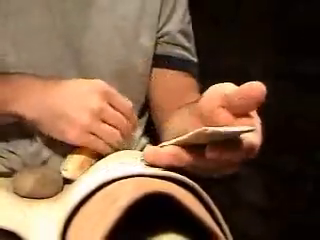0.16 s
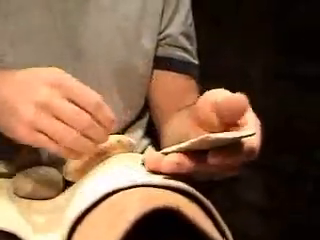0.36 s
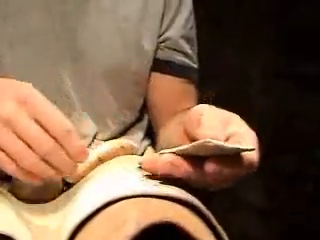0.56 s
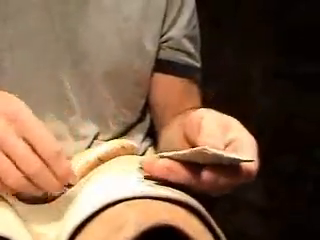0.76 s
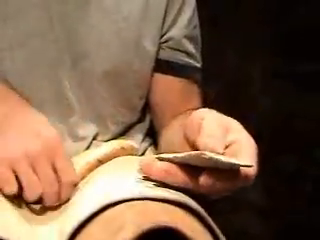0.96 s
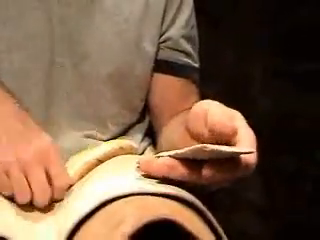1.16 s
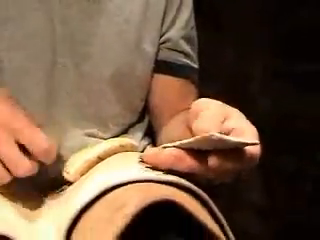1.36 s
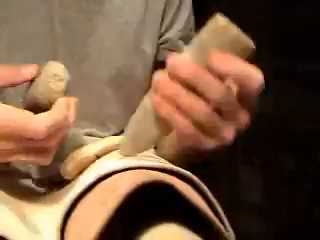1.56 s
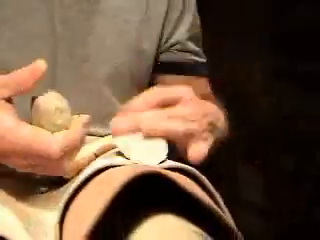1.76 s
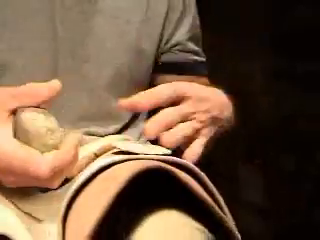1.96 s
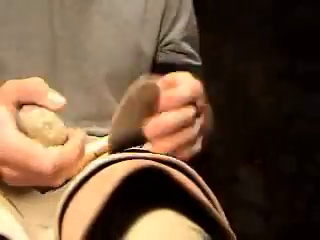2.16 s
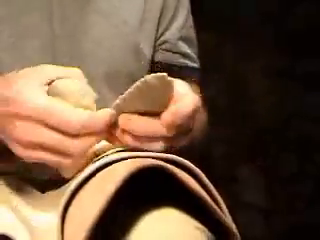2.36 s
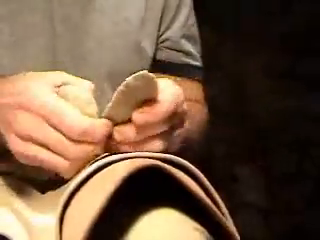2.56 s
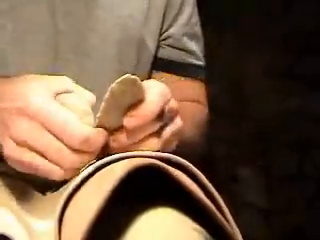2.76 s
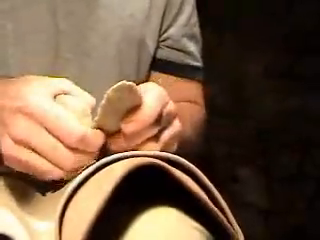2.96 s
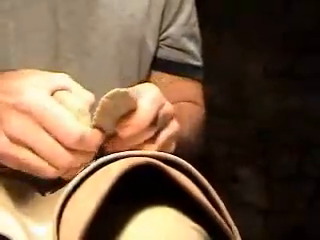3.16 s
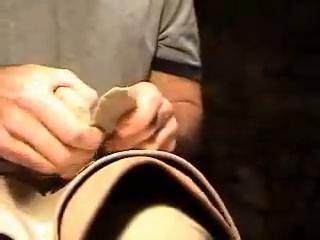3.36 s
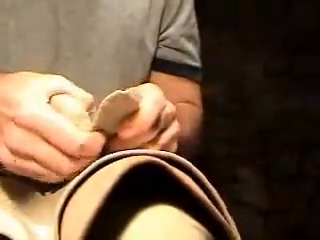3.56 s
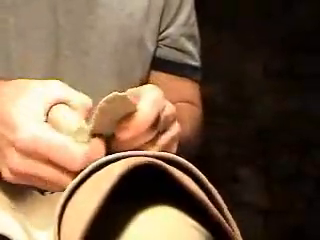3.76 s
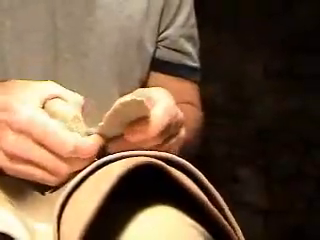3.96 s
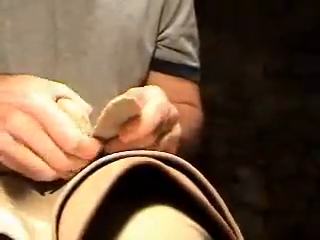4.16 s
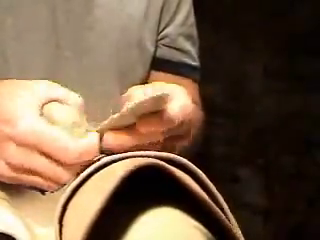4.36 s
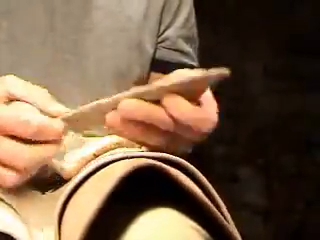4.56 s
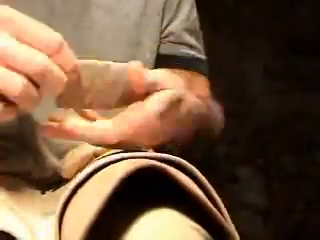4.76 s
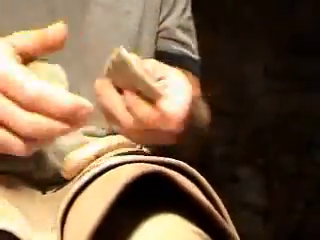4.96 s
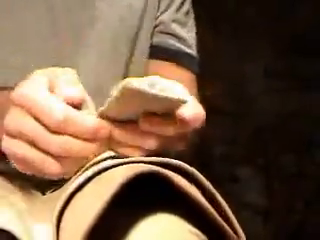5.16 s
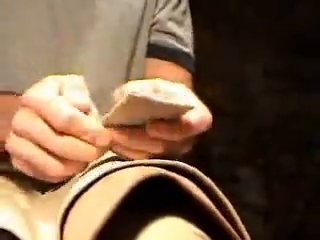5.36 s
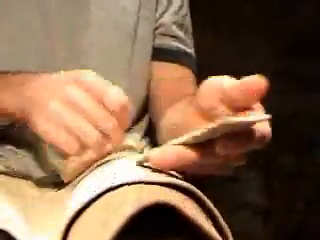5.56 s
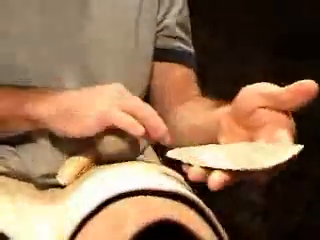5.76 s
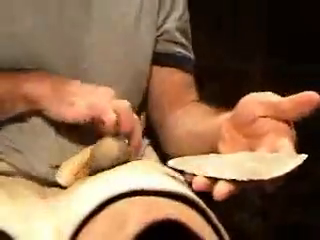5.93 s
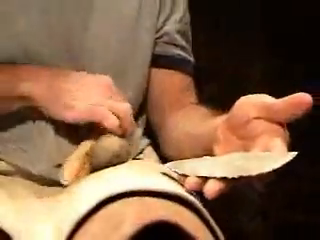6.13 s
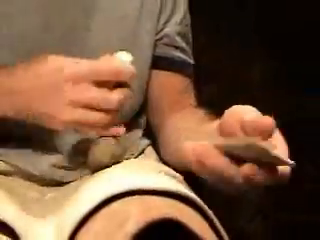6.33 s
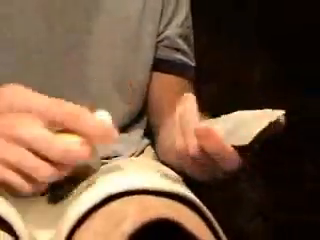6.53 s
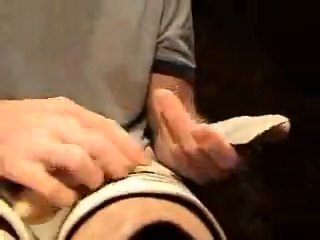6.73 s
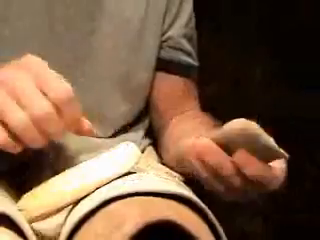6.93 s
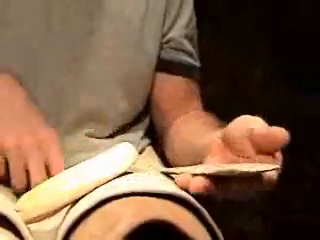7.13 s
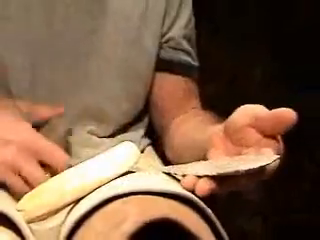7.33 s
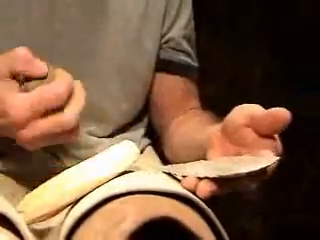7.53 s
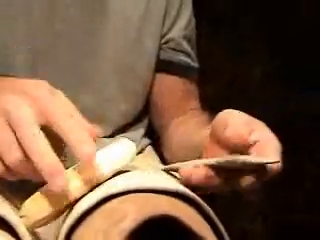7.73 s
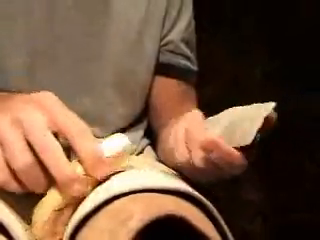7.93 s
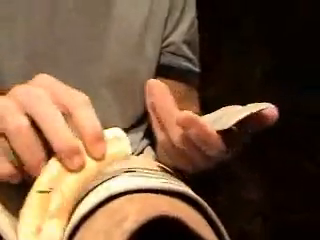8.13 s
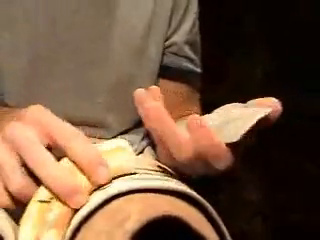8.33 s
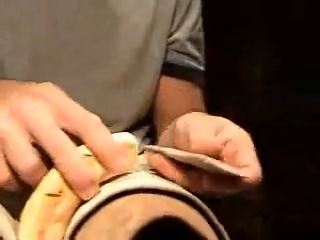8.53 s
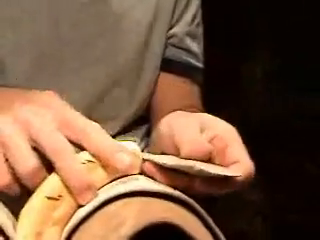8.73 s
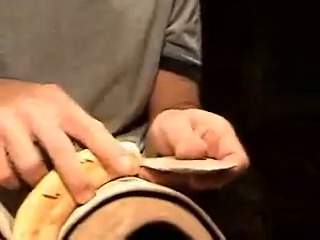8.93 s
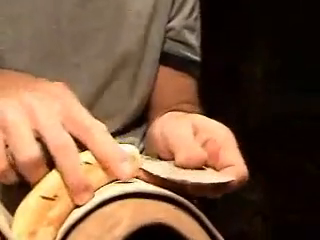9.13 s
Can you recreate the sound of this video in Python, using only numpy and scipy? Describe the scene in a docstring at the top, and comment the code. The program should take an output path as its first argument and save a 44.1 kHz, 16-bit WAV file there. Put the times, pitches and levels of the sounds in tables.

```python
"""A bare room, with a close microphone facing a knapper at work; the sound is narrow-band, nearly mono.
He rasps the edge of a flint blade with a small abrading stone: the grit grinds, catches and rings the
hand-held blade. Between strokes he brushes the leather leg pad, turns the blade in his fingers and sets
stones and tools down on his lap. The walls answer; a faint low drone, like a far engine, rises late."""
import sys
import numpy as np
from scipy import signal
from scipy.fft import rfft, irfft, next_fast_len
from scipy.io import wavfile
from scipy.ndimage import uniform_filter1d, minimum_filter1d

SR = 44100
rng = np.random.default_rng(int(sys.argv[2]) if len(sys.argv) > 2 else 0)


def master_out(mix):
    """Clip the mix to full scale and print it as 16-bit PCM to the path in sys.argv[1]."""
    frames = np.transpose(np.atleast_2d(mix))
    ceiling = np.clip(frames, -1, 1)
    pcm = np.round(ceiling * 32767).astype(np.int16)
    wavfile.write(sys.argv[1], SR, pcm)


N = 405279

# Strokes along the edge. Each row: start and length in seconds, then ring level, crunch level and
# sag of the pressure over the stroke, all in dB.
EDGE_STROKES = [(2.98, 0.077, -25, -30, 12.5), (3.109, 0.053, -26, -31, 0), (3.214, 0.15, -28, -36.5, 6),
                (3.381, 0.095, -30, -24.5, -2), (3.474, 0.055, -23, -27, 3), (3.551, 0.029, -19, -25, -6),
                (3.654, 0.08, -26, -24.5, 7), (3.767, 0.033, -23, -31, -4), (3.856, 0.044, -29, -29, 8),
                (3.896, 0.089, -25, -28.5, -1.5), (4.389, 0.048, -30, -34.5, -15),
                (4.464, 0.029, -22, -26.5, 14), (4.495, 0.045, -27, -31.5, 4),
                (5.372, 0.14, -20.5, -26.5, 1), (5.514, 0.1, -17, -27, 1), (5.564, 0.094, -25.5, -25.5, 7)]
# Grit catches on the edge. Each row: start in seconds, level in dB, ring in Hz, chip over ring in dB.
GRIT_CATCHES = [(2.8549, -26.5, 2120, -18.5), (2.8714, -26, 1920, -23), (2.9272, -14.5, 2110, -21.5),
                (2.9455, -12, 2060, -18.5), (2.9622, -12.5, 2200, -12), (2.9755, -6.5, 2210, -25),
                (2.9876, -2, 2200, -12), (2.9912, -2.5, 2120, -28), (3.0028, -10.5, 2090, -9),
                (3.0085, -5.5, 2150, -14), (3.0264, -10, 1940, -10), (3.1364, -6, 2110, -17),
                (3.1748, -13, 2080, -18), (3.2006, -7.5, 2166, -24), (3.2168, 2, 2134, -21),
                (3.2268, -6.5, 2150, -19), (3.2372, -6.5, 1980, -9.5), (3.2445, -4.5, 1980, -23),
                (3.2984, -15.5, 2130, -26), (3.3105, -14, 2130, -25), (3.3885, -3, 2050, -10.5),
                (3.4092, -4.5, 2270, -13.5), (3.4283, -5.5, 2250, -12), (3.4397, -8.5, 2310, -12),
                (3.4565, -3.5, 2210, -10.5), (3.4775, -6, 2130, -1), (3.4828, -11, 2025, -15),
                (3.4905, -11, 2130, -27), (3.4954, -12, 2080, -16), (3.5563, -8, 1890, -15),
                (3.5618, -2, 2190, -8.5), (3.5665, -13, 2100, -11), (3.5714, -5, 2050, -8),
                (3.6632, -3, 2150, -16), (3.6684, -7, 2130, -10.5), (3.6872, 0, 2130, -18.5),
                (3.6914, -3, 2140, -17), (3.6964, -5.5, 2120, -17), (3.7114, -8, 2160, -22),
                (3.7784, -10.5, 1950, -12), (3.7858, -11.5, 2100, -20), (3.7963, -3.5, 2100, -21),
                (3.8676, -13.5, 2210, -4), (3.8822, -13, 2160, -17), (3.8995, -2, 2050, -1.5),
                (3.9034, -5.5, 2200, -14), (3.9135, -16, 2190, -18), (3.9285, -6.5, 2090, -21),
                (4.3785, -26.5, 2020, -12), (4.4233, -5.5, 2105, -22), (4.4324, -12, 2030, -14),
                (4.4433, -11.5, 2210, -6.5), (4.4677, -5.5, 2030, -19), (4.4955, -9, 2375, -11),
                (4.5044, -10, 2160, -19), (4.5205, -16, 2110, -28), (5.4181, -7, 2080, -18),
                (5.4665, -7, 2000, -26), (5.5185, -6, 2020, -26), (5.5234, -8, 1980, -27),
                (5.5444, -7.5, 1960, -20)]
# The blade's resonances. Each row: frequency in Hz, width in Hz, level in dB.
UPRIGHT_MODES = [(1065, 210, -13.5), (1860, 320, -5), (2183, 293, -3), (2310, 660, -7.5),
                 (2740, 176, -15.5), (3687, 170, -18.5), (4620, 200, -18), (5104, 190, -14.5),
                 (5770, 150, -16.5), (6350, 110, -19), (6700, 130, -19), (7500, 49, -24.5)]
FLAT_MODES = [(1090, 390, -14), (1980, 600, 1.5), (2200, 370, -0.5), (2790, 270, -7.5), (4710, 400, -17),
              (5410, 460, -21), (6770, 250, -23.5)]
LOOSE_MODES = [(1910, 9.2, 8), (1990, 11, 9), (2130, 13, -1.5)]  # these ring on when the blade lies flat
SINGING_MODES = [(1944, 34, 1), (4708, 140, 1), (5564, 130, -3.5), (7360, 130, -7.5)]  # under sliding fingers, lowest first
# Stone on stone. Each row: start in seconds, peak in dB.
BLADE_TAPS = [(4.967, -39.5), (5.3433, -1.5)]  # the stone taps the loosely held blade
COBBLE_CLACKS = [(5.8898, -0.5), (5.8918, -9.5)]  # it drops against another stone and strikes twice
# The ring after a blow. Each row: frequency in Hz, level in dB, seconds to fall 60 dB.
BLADE_FREE_MODES = [(1797, -19.5, 0.084), (1992, 0, 0.059), (2210, -4, 0.041), (2320, 16.5, 0.0077),
                    (2910, 20, 0.004), (4550, -5.5, 0.016), (5750, -32, 0.077), (7140, -14, 0.014)]
COBBLE_MODES = [(2780, -5.5, 0.0084), (3400, -17.5, 0.0099), (4910, -15.5, 0.0088), (6471, -34, 0.036),
                (7170, -26, 0.015)]
# Tools land on the lap. Each row: start in seconds, peak in dB, click over thud in dB, hollow note in Hz.
LAP_KNOCKS = [(0.2455, -30, -10, 432), (1.9494, -19, -7, 370), (2.0581, -19, 0, 490),
              (2.2613, -25.5, 1, 394), (6.0436, -16, 6.5, 680), (6.1567, -28, -6, 680),
              (6.7848, -16, 2, 500), (7.1857, -21, -7, 463), (7.315, -28.5, -14, 680),
              (7.3592, -23, -2, 680), (7.435, -15, -1.5, 700), (8.0005, -33, 4, 700),
              (8.375, -31.5, 5, 700), (8.4075, -26, -5, 710)]
# Slides over leather and cloth. Each row: peak time, rise and fall in seconds, rustle and hiss in dB.
LEATHER_SLIDES = [(0.281, 0.16, 0.17, -48.5, -60), (0.62, 0.051, 0.098, -38, -34),
                  (1.035, .02, 0.076, -46, -43.5), (1.15, 0.16, 0.1, -43.5, -56),
                  (1.355, 0.082, 0.21, -41.5, -47.5), (1.809, 0.16, 0.059, -41.5, -47),
                  (2.41, 0.17, 0.073, -42, -49.5), (5.0, 0.095, 0.11, -54, -52.5),
                  (6.385, 0.093, 0.1, -48, -57.5), (6.989, 0.19, 0.028, -40.5, -48.5),
                  (7.44, 0.048, 0.014, -37, -42.5), (8.06, 0.068, 0.084, -40, -48),
                  (8.18, 0.039, 0.11, -44, -53), (8.53, 0.63, 0.5, -51.5, -60)]
# Quick scuffs on the gritty pad. Each row: start in seconds, peak in dB, length in seconds.
PAD_SCUFFS = [(0.602, -17, 0.018), (1.02, -19.5, 0.0077), (1.48, -30, 0.024), (1.529, -28.5, 0.0075),
              (1.617, -29.5, 0.025), (1.797, -31.5, 0.02), (5.793, -31.5, 0.0065), (5.839, -31, 0.051),
              (6.854, -22.5, 0.016), (6.876, -24.5, 0.013), (6.958, -30, 0.021), (7.285, -29.5, 0.023),
              (8.004, -36, 0.03), (8.046, -33, 0.038)]
# Fingers on the blade. Each row: peak time and rise in seconds, lowest mode and upper modes in dB.
FINGER_SLIDES = [(0.088, .067, -57.5, -53.5), (1.808, 0.059, -38, -38), (2.041, 0.11, -54, -45),
                 (2.45, .04, -45.5, -48), (4.82, .06, -61, -56), (5.077, 0.055, -50, -51.5),
                 (7.16, .06, -50, -54.5), (8.662, 0.047, -60, -51)]
# The far drone. Each row: time in seconds, pitch in Hz, level in dB.
DRONE_PATH = [(0.0, 30.1, -50.5), (0.54, 33.16, -63), (1.56, 28.54, -59), (2.89, 27.4, -47),
              (5.04, 26.57, -59.5), (5.71, 27.5, -53), (6.301, 48.34, -59.5), (7.37, 50.4, -50.5),
              (7.78, 56.7, -54), (9.19, 60.1, -54.5)]
# Spectra. Each row: frequency in Hz, gain in dB.
GRIT_SPECTRUM = [(40, -26.5), (150, -29), (500, -19.5), (1400, -20), (3200, -32), (5000, -26.5),
                 (7600, -27.5), (9000, -25)]  # crushing under the blade's resonances
COBBLE_SPECTRUM = [(40, -8), (130, -3), (400, -8.5), (1000, -1), (1800, 2), (3500, -1), (3850, -25),
                   (4600, -26), (5200, 2.5), (5700, -36), (8000, -50)]  # its thump and heavily damped body
THUD_SPECTRUM = [(35, -43), (70, -3.5), (220, 4.5), (400, 3.5), (750, 7.5), (1100, 3), (1980, -1.5),
                 (3100, -10.5), (4000, -28), (5200, -70)]
CLICK_SPECTRUM = [(300, -25.5), (850, -1.5), (1600, 5.5), (2400, -3), (3300, -10), (4200, -22), (8000, -37)]
RUSTLE_SPECTRUM = [(120, -53), (200, -2.5), (588, -4.5), (1150, 0), (1640, 0), (4000, -9), (5200, -44.5),
                   (8800, -120)]
HISS_SPECTRUM = [(1000, -22), (2500, -3.5), (4500, 5), (7500, 6), (9000, -41)]
SCUFF_SPECTRUM = [(88, -55), (150, -13), (296, 2.5), (566, -3.5), (2570, 3.5), (3030, -5.5), (3400, -2.5),
                  (10300, -4), (17500, -74)]
WALL_SPECTRUM = [(150, 3.5), (700, 2.5), (1400, -1.5), (2100, -3), (3000, -1.5), (7500, 0.5)]
ROOM_TONE_SPECTRUM = [(29, -22.5), (50, -2.5), (360, -14.5), (454, -19), (723, -17), (1800, -21),
                      (2990, -25.5), (4670, -27), (7940, -31.5), (10300, -58.5), (17500, -120)]
FIZZ_SPECTRUM = [(8500, -30.5), (11000, -36.5), (12000, -49)]  # faint high fizz above 8 kHz
# The room's decay. Each row: frequency in Hz, seconds to fall 60 dB.
ROOM_DECAY = [(150, 0.031), (500, 0.48), (1500, 0.44), (4000, 0.45), (8000, 0.31)]
# Stereo width at the microphone. Each row: frequency in Hz, side over mid in dB.
REFLECTION_WIDTH = [(30, -6), (130, -4), (300, -10), (1000, -5.5), (2200, -10.5), (4500, -8), (8000, -13)]
ROOM_TONE_WIDTH = [(60, -19.5), (300, -4), (600, 1.5), (1500, -7.5), (3350, -9), (7490, -22.5)]

LAID_FLAT_S = 5  # the blade is upright until then
CROSSOVER_HZ = 3490  # the blade's ring lies below, the crunch of the grit above
CRUNCH_FOLLOWS = 0.5  # share of the sag that the crunch follows
GRIP_PITCH_SPREAD, CONTACT_SPREAD_DB = 0.02, 2.5  # scatter from contact to contact
CHIP_HZ, CHIP_PITCH_SPREAD, CHIP_WIDTH_HZ, CHIP_PEAK_DB = 5720, 0.18, 1220, 5.5
JOLT_HZ, JOLT_PITCH_SPREAD, JOLT_S, JOLT_DB = 432, 0.552, 0.0012, -27.5
TOP_HZ, FIZZ_TOP_HZ = 7780, 15800


def abrading():
    """Grit grinds and catches on the edge: coarsely with the blade upright, finely once it lies flat."""
    upright, flat = np.zeros((2, N))
    coarse = dict(hold=UPRIGHT_MODES, rate=1100, spread_db=2.5, attack=0.0051, release=0.004)
    fine = dict(hold=FLAT_MODES, rate=3500, spread_db=-0.2, attack=0.022, release=0.016)
    for s, length, ring_db, crunch_db, sag_db in EDGE_STROKES:
        track, texture = (upright, coarse) if s < LAID_FLAT_S else (flat, fine)
        add(track, s, stroke(length, ring_db, crunch_db, sag_db, **texture))
    for s, db, ring_hz, chip_db in GRIT_CATCHES:
        track, hold = (upright, UPRIGHT_MODES) if s < LAID_FLAT_S else (flat, FLAT_MODES)
        add(track, s, amp(db) * catch(hold, ring_hz, chip_db))
    return upright + filtered(flat, lambda hz: np.hypot(1, resonant(LOOSE_MODES)(hz)))


def stroke(length, ring_db, crunch_db, sag_db, hold, rate, spread_db, attack, release):
    """A stream of crushed grains rings the blade and crunches above its ring; both follow the pressure."""
    t = np.arange(0, length, 1 / SR)
    fade = np.clip(np.minimum(t / attack, (length - t) / release), 0, 1)
    pressure_db = sag_db * (0.5 - t / length)
    grind = filtered(grains(rate, spread_db, size=len(t)), gripped(hold))
    low = unit(filtered(grind, lambda hz: 1 / np.hypot(1, (hz / CROSSOVER_HZ) ** 10)))
    high = unit(filtered(grind, lambda hz: 1 / np.hypot(1, (CROSSOVER_HZ / (hz + 1)) ** 10)))
    ringing = amp(ring_db + pressure_db) * low
    crunch = amp(crunch_db + CRUNCH_FOLLOWS * pressure_db) * high
    return fade * (ringing + crunch)


def catch(hold, ring_hz, chip_db):
    """The edge crumbles, kicks the main bending mode and jolts the hand; a chip snaps off."""
    t = np.arange(SR // 50) / SR
    pulse = lambda span: peaked((t / span) ** 3 * np.exp(-t / span))
    force = pulse(0.00072)
    crumble = peaked(filtered(force * rng.standard_normal(len(t)), gripped(hold)))
    kick = force * np.sin(2 * np.pi * ring_hz * t)
    jolt = pulse(JOLT_S) * np.sin(2 * np.pi * JOLT_HZ * scatter(JOLT_PITCH_SPREAD) * t)
    snap = resonant([(CHIP_HZ * scatter(CHIP_PITCH_SPREAD), CHIP_WIDTH_HZ, CHIP_PEAK_DB)])
    chip = filtered(pulse(0.001) * rng.standard_normal(len(t)), snap)
    return peaked(crumble + amp(-1.0) * kick) + amp(JOLT_DB) * jolt + amp(chip_db) * chip


def gripped(hold):
    """One contact's colour: the grip shifts the blade's resonances, the spot on the edge favours some."""
    shift = scatter(GRIP_PITCH_SPREAD)
    peaks = [(hz, width, db + CONTACT_SPREAD_DB * rng.standard_normal()) for hz, width, db in hold]
    return lambda hz: np.hypot(resonant(peaks)(hz * shift), shape(GRIT_SPECTRUM)(hz))


def stone_blows():
    """Stone meets stone: the blade rings clearly, the cobble gives a dry, biting clack over a thump."""
    out, t = np.zeros(N), np.arange(SR // 4) / SR
    for s, db in BLADE_TAPS:
        blade = ring(BLADE_FREE_MODES, t) * (1 - np.exp(-t / 0.0018))
        add(out, s, amp(db) * peaked(blade + contact(t, crush=0.074, t60=0.015)))
    for s, db in COBBLE_CLACKS:
        body = peaked(filtered(contact(t, crush=0.32, t60=0.018), shape(COBBLE_SPECTRUM)))
        add(out, s, amp(db) * peaked(body + ring(COBBLE_MODES, t)))
    return out


def tool_knocks():
    """A tool lands: the pad thuds, the lap gives a short hollow note, the hard parts click."""
    out, t = np.zeros(N), np.arange(SR // 10) / SR
    for s, db, click_db, hollow_hz in LAP_KNOCKS:
        thud = unit(filtered(contact(t, crush=0.37, t60=0.046), shape(THUD_SPECTRUM)))
        hollow = unit(ring([(hollow_hz, 0, 0.023)], t))
        click = unit(filtered(contact(t, crush=0.16, t60=0.0074), shape(CLICK_SPECTRUM)))
        add(out, s, amp(db) * peaked(thud + amp(-2.5) * hollow + amp(click_db) * click))
    return out


def leather_rustle():
    """Skin and tools drag over leather: a grainy rustle with quick scuffs."""
    rustle = unit(filtered(grains(rate=2500, spread_db=4.0), shape(RUSTLE_SPECTRUM)))
    hiss = unit(filtered(grains(rate=2200, spread_db=7.5), shape(HISS_SPECTRUM)))
    out = sum(swell(s, rise, fall) * (amp(rustle_db) * rustle + amp(hiss_db) * hiss)
              for s, rise, fall, rustle_db, hiss_db in LEATHER_SLIDES)
    for s, db, length in PAD_SCUFFS:
        progress = np.arange(SR // 4) / SR / length
        drag = filtered(grains(rate=4200, spread_db=0.5, size=len(progress)), shape(SCUFF_SPECTRUM))
        add(out, s, amp(db) * peaked(drag * progress * np.exp(-3.5 * progress)))
    return out


def blade_singing():
    """Light finger friction keeps the blade's narrow modes sounding; the grip decides which are free."""
    low_gain, high_gain = sum(swell(s, rise, fall=0.056) * amp([[low_db], [high_db]])
                              for s, rise, low_db, high_db in FINGER_SLIDES)
    low = unit(filtered(rng.standard_normal(N), resonant(SINGING_MODES[:1])))
    high = unit(filtered(rng.standard_normal(N), resonant(SINGING_MODES[1:])))
    return low_gain * low + high_gain * high


def reflections(x, build_up_s):
    """The walls' answer swells, then dies by band; a new tail each half second stands for moving hands."""
    out, hop = np.zeros((2, N + SR)), SR // 2
    for start in range(0, N, hop):
        hz, t, noise = signal.stft(rng.standard_normal((2, SR // 2)), SR, nperseg=256)
        decay = amp(-60 * t / along(ROOM_DECAY, hz)[:, None])
        onset = 1 - np.exp(-(t / build_up_s) ** 2)
        tail = signal.istft(noise * decay * onset, SR)[1]
        answer = signal.fftconvolve(x[None, start:start + hop], tail / np.linalg.norm(tail[0]), axes=1)
        out[:, start:start + answer.shape[1]] += answer
    return diffuse(*filtered(out[:, :N], shape(WALL_SPECTRUM)), REFLECTION_WIDTH)


def far_drone():
    """One low tone in the distance idles and then climbs."""
    s, hz, db = np.transpose(DRONE_PATH)
    t = np.arange(N) / SR
    phase = 2 * np.pi * np.cumsum(np.interp(t, s, hz)) / SR
    return amp(np.interp(t, s, db)) * unit(np.sin(phase))


def room_tone():
    """A steady, dark hush from all around the microphone."""
    mid, side = unit(filtered(rng.standard_normal((2, N)), shape(ROOM_TONE_SPECTRUM)))
    return diffuse(mid, side, ROOM_TONE_WIDTH)


def diffuse(mid, side, width):
    """The two close microphone ports hear diffuse sound almost alike."""
    side = filtered(side, shape(width))
    return np.array([mid + side, mid - side])


def grains(rate, spread_db, size=N):
    """Tiny impacts of scattered sizes at random moments, about `rate` a second."""
    impacts = (rng.random(size) < rate / SR) * rng.choice([-1, 1], size)
    return impacts * amp(spread_db * np.minimum(rng.standard_normal(size), 2))


def contact(t, crush, t60):
    """The force of a blow: one spike and a short crumbling, equally strong at all frequencies."""
    force = rfft((t == 0) + crush * rng.standard_normal(len(t)) * amp(-60 * t / t60))
    return irfft(force / np.abs(force), len(t)) * amp(-20 * t / t60)


def ring(modes, t):
    """Damped modes, at slightly new strengths for each blow."""
    return sum(amp(db + rng.normal(0, 1) - 60 * t / t60) * np.sin(2 * np.pi * hz * t)
               for hz, db, t60 in modes)


def swell(s, rise, fall):
    """Gain of a sliding movement that peaks at s; rise and fall, in seconds, each span 20 dB."""
    t = np.arange(N) / SR - s
    return amp(-20 * np.minimum(np.maximum(-t / rise, t / fall), 10))


def resonant(peaks):
    """The gain of a set of steep-sided resonances as a function of frequency."""
    bell = lambda hz, centre, width: (hz * width) ** 2 / ((centre ** 2 - hz ** 2) ** 2 + (hz * width) ** 2)
    return lambda hz: np.sqrt(sum((amp(db) * bell(hz, centre, width)) ** 2 for centre, width, db in peaks))


def shape(points):
    """The gain of a (Hz, dB) spectrum as a function of frequency."""
    return lambda hz: amp(along(points, hz))


def along(points, hz):
    """Interpolate (Hz, value) points on a log axis."""
    point_hz, values = np.transpose(points)
    return np.interp(np.log(hz + 1), np.log(point_hz + 1), values)


def filtered(x, gain):
    """x through the causal filter with that gain."""
    size = 2 * next_fast_len(x.shape[-1] // 2 + 2048)
    cepstrum = irfft(np.log(np.maximum(gain(np.fft.rfftfreq(size, 1 / SR)), 1e-6)))
    cepstrum[1:size // 2] *= 2  # fold onto positive time for minimum phase
    cepstrum[size // 2 + 1:] = 0
    return irfft(rfft(x, size) * np.exp(rfft(cepstrum)), size)[..., :x.shape[-1]]


def add(track, s, sound):
    """Mix a sound in at s seconds."""
    start = round(s * SR)
    track[start:start + len(sound)] += sound[:N - start]


def scatter(spread):
    """A random factor around 1."""
    return np.exp(spread * rng.standard_normal())


def amp(db):
    return 10 ** (np.asarray(db) / 20)


def unit(x):
    return x / np.sqrt(np.mean(x ** 2) + 1e-20)


def peaked(x):
    return x / np.max(np.abs(x))


def scene():
    """The work happens almost straight ahead of the microphone, with the room behind it."""
    work = abrading() + stone_blows() + tool_knocks() + leather_rustle() + blade_singing()
    direct = work * amp([[0.2], [-0.2]])
    walls = amp(-6.5) * reflections(work, build_up_s=0.0025)
    return direct + walls + far_drone() + amp(-50.5) * room_tone()


def record(dry):
    """A fast limiter holds down the highest peaks; above 8 kHz there is only a faint high fizz."""
    ceiling, hold = 0.72, SR // 500
    needed_gain = ceiling / np.maximum(np.abs(dry).max(axis=0), ceiling)
    limited = dry * uniform_filter1d(minimum_filter1d(needed_gain, hold), hold)
    below = lambda hz, edge: 1 / np.sqrt(1 + (hz / edge) ** 160)
    band = lambda hz: np.hypot(below(hz, TOP_HZ), shape(FIZZ_SPECTRUM)(hz)) * below(hz, FIZZ_TOP_HZ)
    return filtered(limited, band)


dry = scene()
out = record(dry)
master_out(out)
```